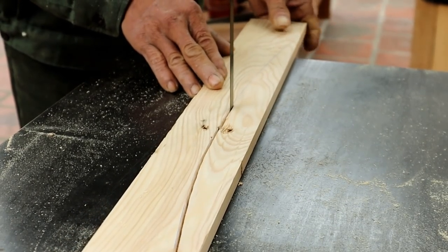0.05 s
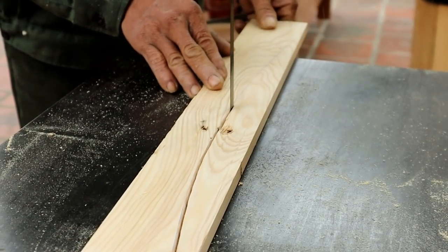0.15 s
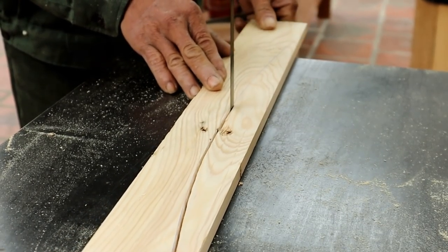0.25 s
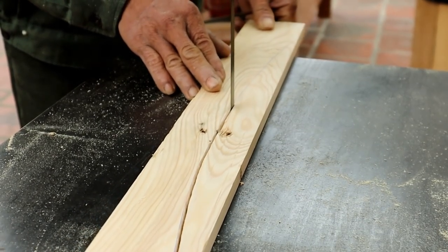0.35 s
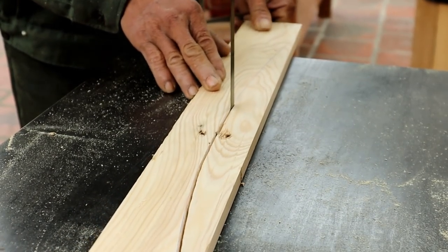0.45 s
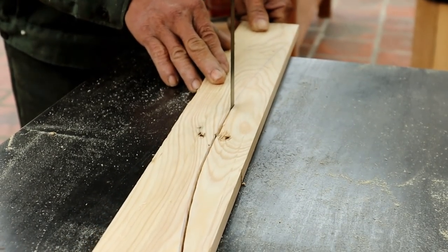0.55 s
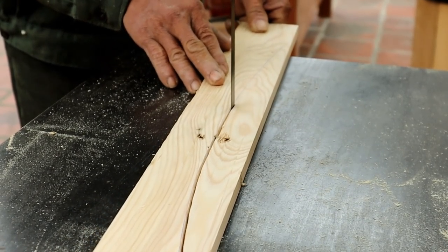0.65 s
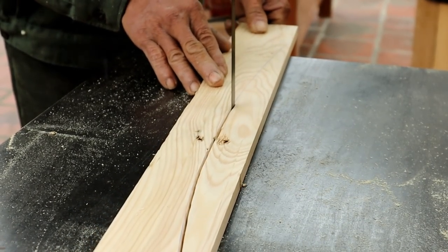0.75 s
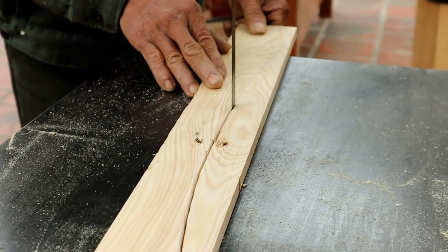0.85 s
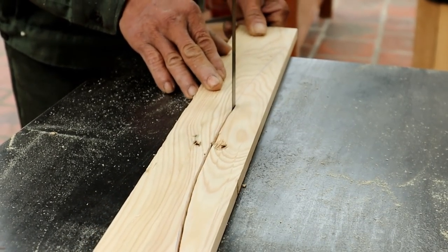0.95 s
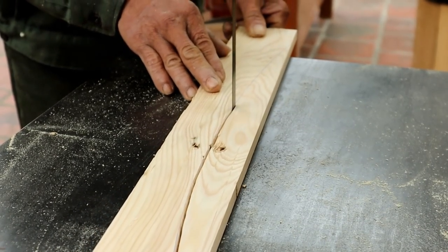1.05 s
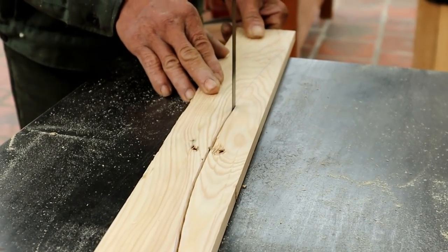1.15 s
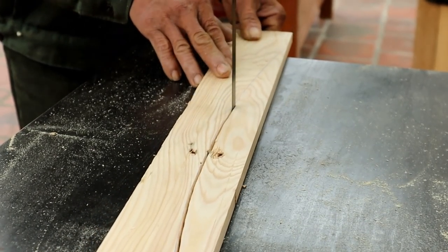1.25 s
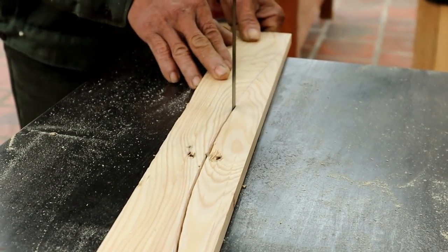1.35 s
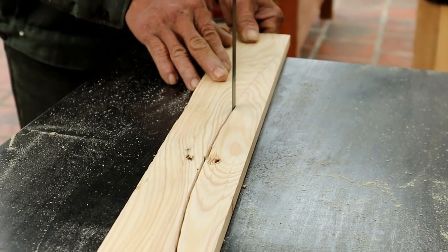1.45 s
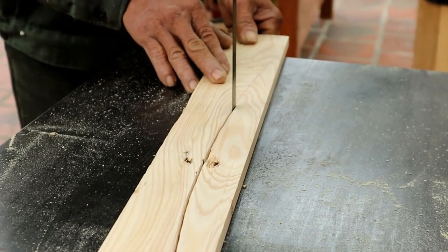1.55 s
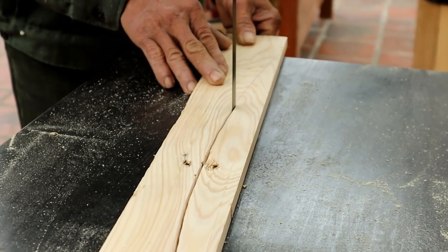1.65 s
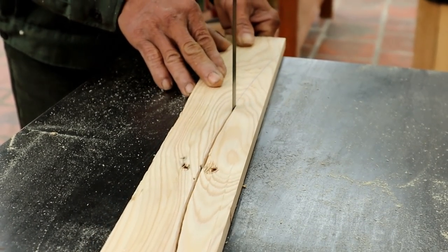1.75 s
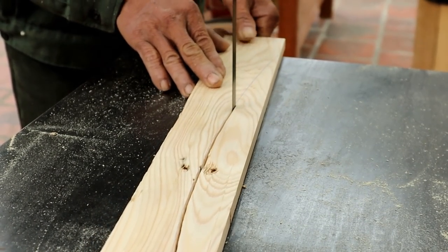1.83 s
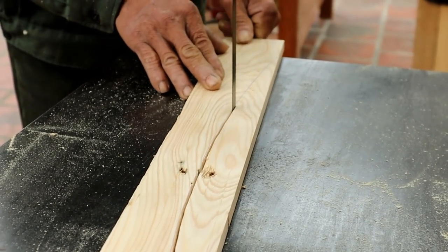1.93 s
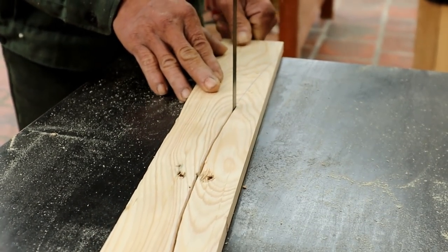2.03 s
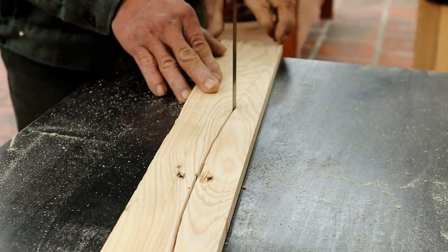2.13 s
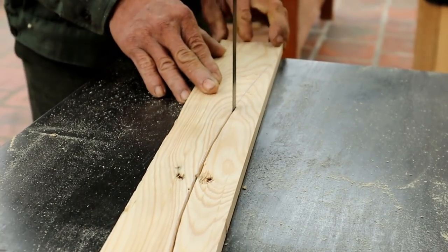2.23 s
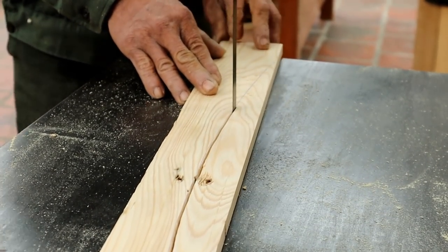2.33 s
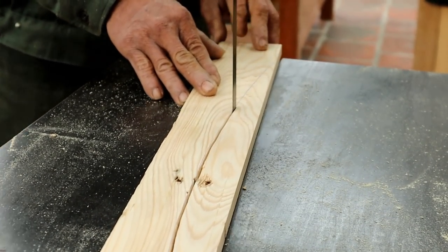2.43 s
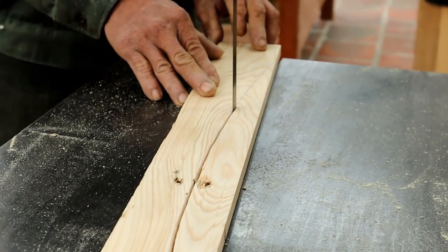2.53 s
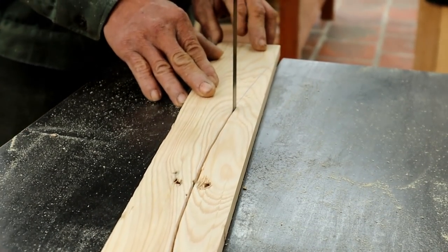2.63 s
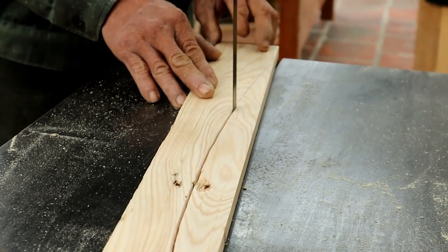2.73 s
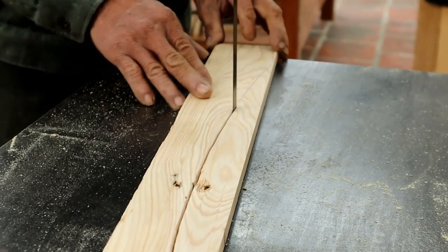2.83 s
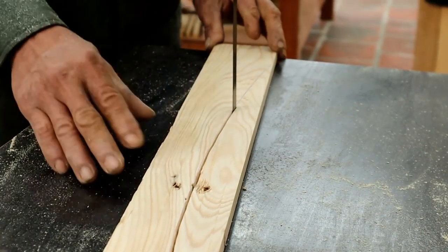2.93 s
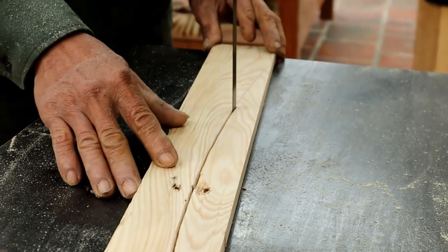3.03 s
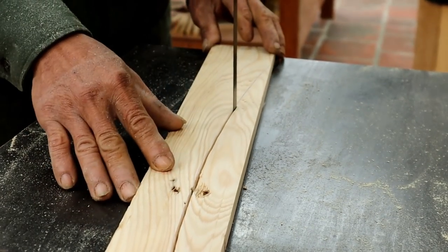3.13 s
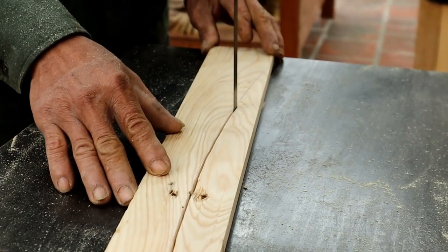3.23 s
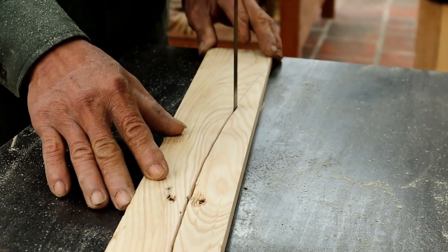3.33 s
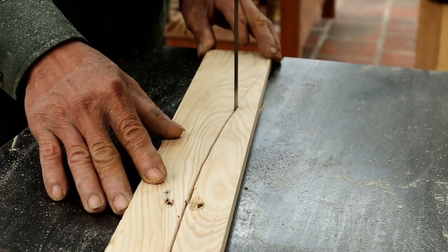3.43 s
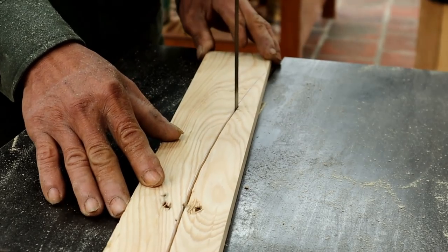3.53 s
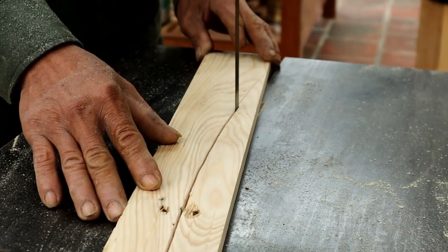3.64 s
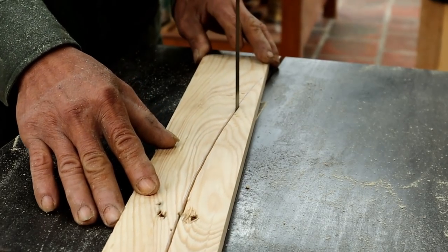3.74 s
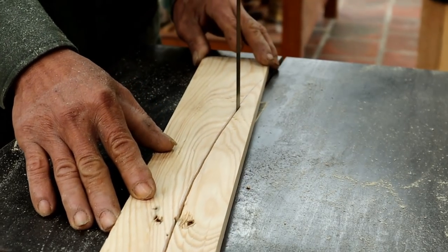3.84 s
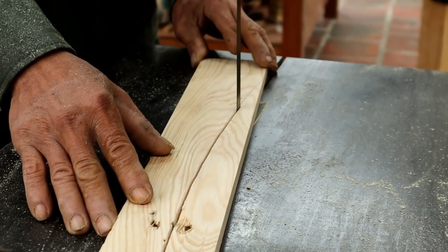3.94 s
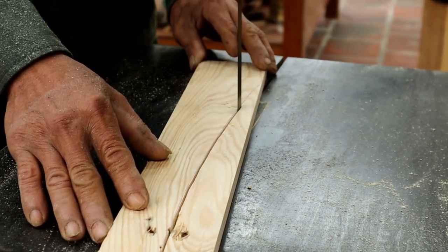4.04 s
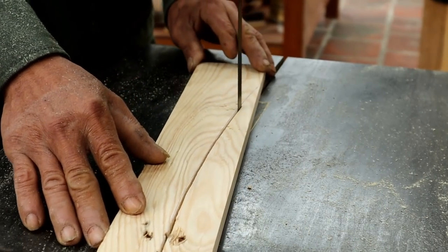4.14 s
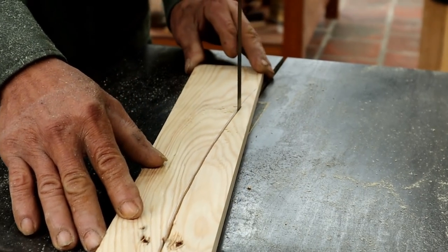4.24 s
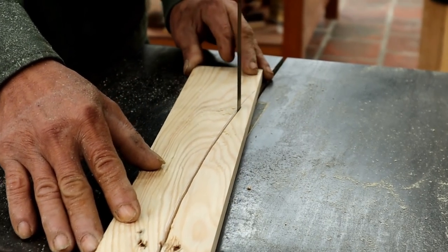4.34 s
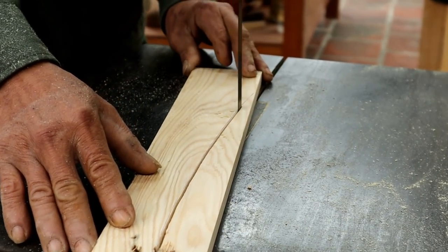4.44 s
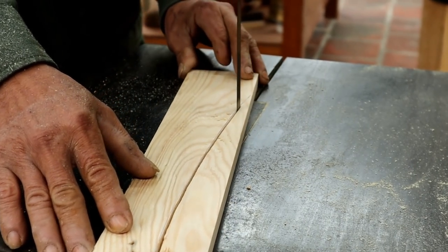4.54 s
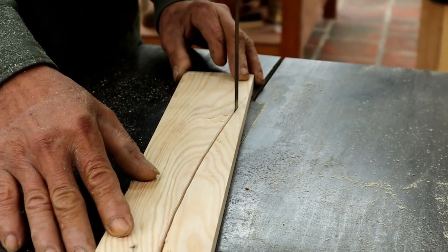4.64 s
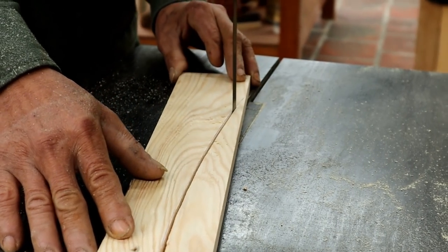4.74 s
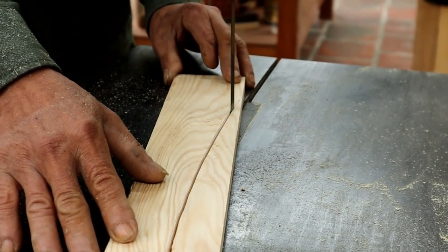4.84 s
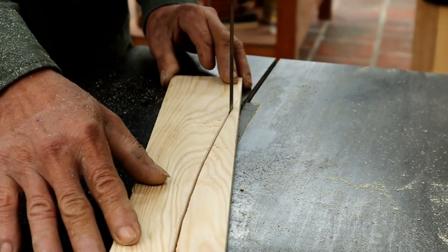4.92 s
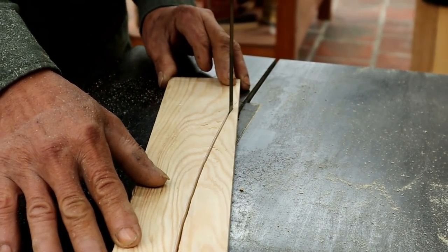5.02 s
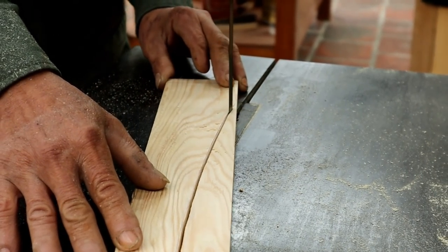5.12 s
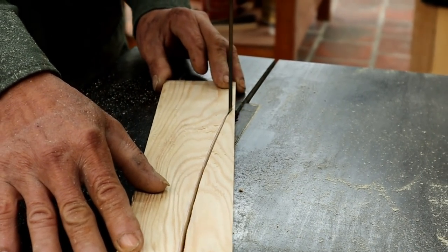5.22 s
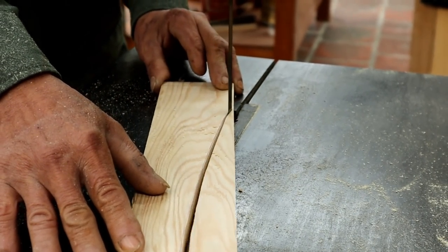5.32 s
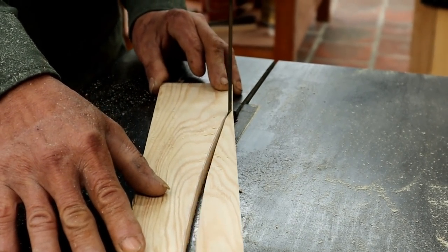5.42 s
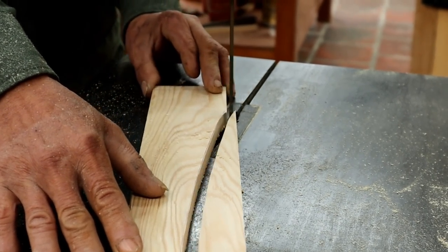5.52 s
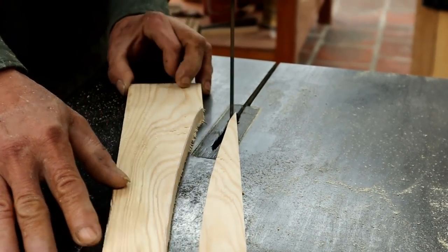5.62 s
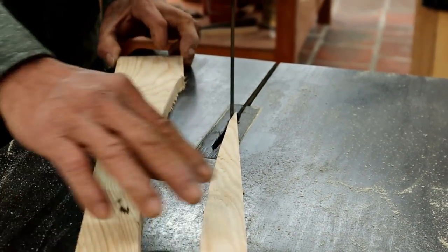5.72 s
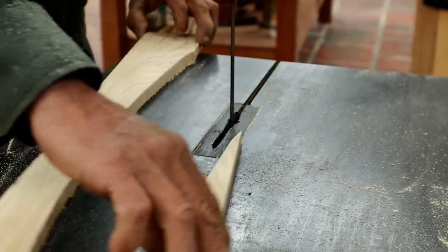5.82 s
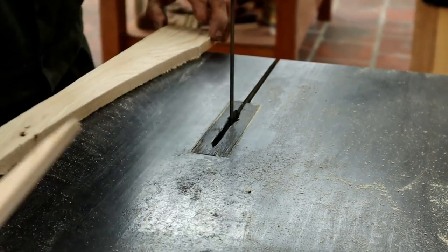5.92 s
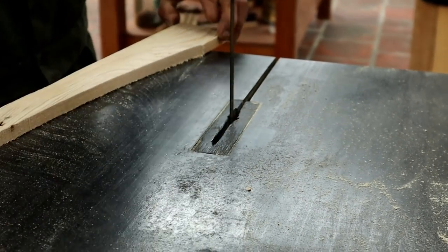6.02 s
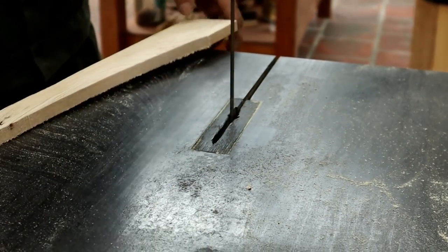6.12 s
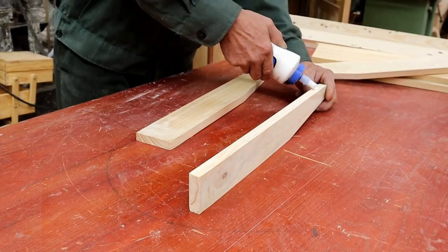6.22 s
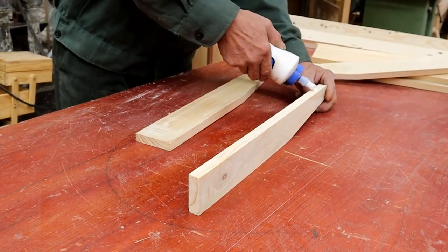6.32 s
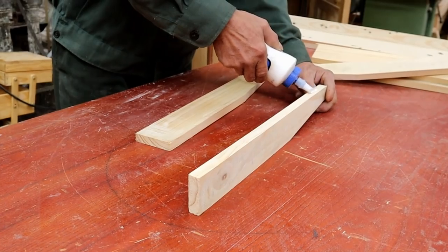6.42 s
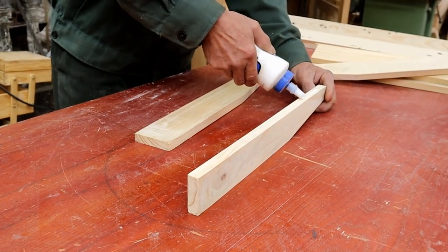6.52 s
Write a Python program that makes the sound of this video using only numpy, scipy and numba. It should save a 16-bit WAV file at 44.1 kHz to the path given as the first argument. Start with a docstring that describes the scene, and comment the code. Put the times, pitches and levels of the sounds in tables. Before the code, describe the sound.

A bandsaw cuts along a pine board, heard close in a workshop. Dense, gritty rasp and bright chip hiss waver with the feed, the board ringing in sliding tones and the blade squealing thinly. At about 5.5 seconds the blade leaves the wood and only steady hiss and faint motor hum remain. A sharp little tick follows, then everything stops dead, leaving very quiet room tone.

```python
"""A bandsaw rips a curve along a pine board: teeth rasp and throw hissing chips as the hands push and ease off.
The cut rings the band and the board, whose resonances slide as the kerf grows; the band squeals thinly.
Beneath, filtered noise makes the running band hiss in its guides; sines make the motor hum and whine.
The band breaks out near 5.5 s and ticks against the loose piece.
At last the sound of the saw stops dead and quiet room tone follows."""
import sys
import numpy as np
from scipy import signal
from scipy.fft import rfft, irfft, next_fast_len
from scipy.io import wavfile
from scipy.ndimage import uniform_filter1d
from numba import njit

SR = 44100
rng = np.random.default_rng(int(sys.argv[2]) if len(sys.argv) > 2 else 0)


def unload_wav(signal):
    """Save mono or channel-first audio to the path in sys.argv[1] as 16-bit WAV at rate SR, clipped to [-1, 1]."""
    wavfile.write(
        sys.argv[1],
        SR,
        np.round(np.clip(np.atleast_2d(signal).T, -1, 1) * 32767).astype(np.int16),
    )


N = 289737
TIME_S = np.arange(N) / SR

TOOTH_HZ, LAP_HZ, SQUEAL_HZ = 127.2, 9.7, 11129
BREAKOUT_S, BREAKOUT_FADE_S = 5.48, 0.038  # the band leaves the wood
STOP_S, CUTOFF_HZ = 6.262, 15750
# dB per dB of feed pressure
RASP_FOLLOWS, CHIPS_FOLLOW, SQUEAL_FOLLOWS = 0.66, 0.19, 1.1

# course of the cut at even feed, before trims: (time [s], low rasp level [dB], chip hiss level [dB])
CUT_COURSE = [(0, -56, -45), (1.4, -52.5, -43), (2.3, -56.5, -45.5), (2.95, -60.5, -45.5),
              (3.2, -57, -41.5), (4.3, -54.5, -40), (5.1, -55, -39), (5.35, -54, -38)]
# hands push harder (+) or ease off (-): (middle [s], length [s], feed pressure change [dB])
FEED_PUSHES = [(0.108, 0.1, -9), (0.35, 0.12, 1), (0.53, 0.26, -2), (1.084, 0.082, 0), (1.406, 0.07, 1),
               (1.865, 0.096, -6.5), (2.051, 0.09, 4.5), (2.153, 0.1, -9), (2.37, 0.11, 0.5),
               (2.622, 0.07, -3.5), (2.81, 0.14, -4), (4.296, 0.14, -5), (4.49, 0.18, 2), (4.73, 0.13, -5),
               (4.94, 0.081, -2)]
# rasp spectrum shape: (frequency [Hz], density [dB per Hz])
RASP_SPECTRUM = [(400, -30.5), (750, -10.5), (1200, -3.5), (1600, -1.5), (2100, 1), (2420, -6),
                 (2900, -0.5), (4000, 1.5), (5200, -1.5), (6500, -17.5), (9000, -21)]
# chip hiss spectrum shape: (frequency [Hz], density [dB per Hz])
CHIP_SPECTRUM = [(3000, -21.5), (5500, -4.5), (6400, 0.5), (7600, -2.5), (9200, 1.5), (11500, -1),
                 (14500, 2.5), (15700, -2.5)]
# frame and steel band resonances:
# (frequency [Hz], width [Hz], level running free [dB], level relative to rasp when cutting [dB])
SAW_RESONANCES = [(728.3, 21, -68.5, -30.5), (836.6, 12, -76.5, -17.5), (915, 22, -69, -26.5),
                  (1047.7, 15, -69, -24.5), (1228, 78, -69, -20.5), (2206, 26, -73, -21),
                  (3482, 47, -66, -16), (3583, 55, -56.5, -2.5), (3778, 10, -64.5, -17),
                  (4203, 97, -62.5, -20), (4580, 74, -68.5, -20.5), (5390, 180, -61, -10),
                  (6380, 75, -61, -10.5), (6720, 46, -59.5, -9.5), (6900, 44, -65.5, -9.5),
                  (7944, 78, -59, -15.5), (8430, 70, -59, -18), (8786, 120, -57, -12.5),
                  (9330, 30, -78.5, -22), (10170, 78, -61, -16.5)]
# board resonances, swelling and sliding as the kerf passes:
# (peak time [s], rise [s], fall [s], frequency at peak [Hz], slide [Hz/s], level [dB], lap throb [dB])
BOARD_RESONANCES = [(0.15, 0.4, 0.27, 2864, 1, -60.5, 2.5), (0.33, 0.8, 0.8, 3420, 91, -49, 2),
                    (0.45, 0.6, 0.53, 1250, -27.5, -61.5, 5.5), (0.75, 0.18, 0.28, 1730, 0, -60.5, 1.5),
                    (1.00, 0.26, 0.7, 4280, -250, -57.5, 1.5), (1.40, 1.3, 0.66, 5400, -450, -54.5, -1),
                    (1.55, 0.19, 0.4, 1866, -57.5, -54.5, 2), (1.70, 0.4, 0.17, 1358, -140, -59.5, 1.5),
                    (2.05, 0.1, 0.54, 1782, 75, -54, 0.5), (2.40, 0.61, 0.61, 1238, -110, -56, 2.5),
                    (3.25, 0.34, 0.49, 1766, 134, -52.5, 1.2), (3.30, 0.45, 0.74, 1116, -190, -59.5, 6.5),
                    (4.05, 0.63, 0.8, 1464, -105, -51.5, 1), (4.10, 0.73, 0.75, 10770, -720, -49.5, 0.5),
                    (4.46, 0.42, 0.2, 2863, -32, -54, 4.5), (4.60, 0.81, 0.8, 9300, -150, -54.5, 4),
                    (4.95, 0.35, 0.16, 10060, -700, -50, -3.5), (5.05, 0.19, 0.28, 2770, -120, -56.5, 3),
                    (5.08, 0.27, 0.27, 1395, -220, -57.5, -1), (5.36, 0.25, 0.36, 9110, -1700, -48, 3.5),
                    (5.45, 0.14, 0.3, 11700, -2000, -48.5, 1)]
# saw table modes, rung by the board lying on it: (frequency [Hz], width [Hz], coupling [dB])
TABLE_RESONANCES = [(1452, 9, -28), (1723, 30, -32), (2896, 24, -28)]
# band binding in the curve: (peak time [s], rise [s], fall [s], level before trims [dB])
BINDINGS = [(1.55, 0.4, 0.35, -55.5), (2.0, 0.17, 1, -50.5), (3.19, 0.2, 0.1, -46), (3.9, 0.4, 0.8, -60),
            (5.33, 0.24, 0.2, -46.5)]
# blows of the freed wood on the band: (time [s], level [dB])
TICK_BLOWS = [(6.1187, -31.5), (6.1245, -42)]
# resonances rung by a tick, before trim: (frequency [Hz], width [Hz], level [dB])
TICK_RESONANCES = [(2150, 90, -13.5), (5900, 400, -23), (6330, 250, -8), (7750, 300, -3.5),
                   (11600, 400, -5.5)]
# running band hiss spectrum shape: (frequency [Hz], density [dB per Hz])
GUIDE_SPECTRUM = [(25, -17.5), (130, -14), (520, -15.5), (640, -6.5), (1000, -8), (1500, -9.5),
                  (2900, -13.5), (3500, -6), (5600, -4), (8500, -2), (11500, -0.5), (15700, 1)]
# motor hum: (frequency [Hz], mean level in mid [dB])
HUM_TONES = [(301.4, -66.8), (602.8, -70.3)]
# wheel and guide roller whines, before trim: (frequency [Hz], level free [dB], level under load [dB])
WHINE_TONES = [(1551, -75, -64), (2495, -74, -78), (3709, -75, -62.5), (4883, -69, -68.5), (5559, -74, -67),
               (5987, -67.5, -67.5)]
# quiet room tone, moved by faint handling: (time [s], level [dB])
ROOM_LEVEL = [(6.3, -88.5), (6.37, -84), (6.41, -87), (6.47, -83), (6.54, -83.5)]
# room tone spectrum shape: (frequency [Hz], density [dB per Hz])
ROOM_SPECTRUM = [(18, -56), (30, -24), (185, 0), (355, -5.5), (905, -11.5), (1090, -9), (1830, -15),
                 (15000, -34)]
# stereo width: (frequency [Hz], side minus mid [dB])
STEREO_WIDTH = [(60, 2), (150, 0), (400, -0.5), (700, -11), (1500, -10), (3000, -9.5), (5000, -1.5),
                (9000, -0.5), (14000, 1)]
# stereo balance: (frequency [Hz], left minus right [dB])
STEREO_LEAN = [(100, -2), (500, -1), (1500, -0.5), (3200, -1.5), (6000, -2.5), (9500, -3.5), (14000, -2.5)]


def from_db(db):
    """Amplitude from dB."""
    return 10 ** (np.asarray(db) / 20)


def rms_one(x):
    """Scale to RMS 1."""
    return x / np.sqrt(np.mean(x ** 2) + 1e-20)


def in_time(rows):
    """Table columns interpolated at every sample."""
    time_s, *columns = np.transpose(rows)
    return [np.interp(TIME_S, time_s, column) for column in columns]


def swell(peak_s, rise_s, fall_s):
    """Bell of height 1, about 9 dB down one rise before and one fall after its top."""
    spread_s = np.where(TIME_S < peak_s, rise_s, fall_s)
    return np.exp(-((TIME_S - peak_s) / spread_s) ** 2)


def noise():
    """Unrelated white noise for mid and side."""
    return rng.standard_normal((2, N))


def drift(rate_hz):
    """Smooth random wander of RMS 1: two-pole filtered noise, interpolated from every 40th sample."""
    step = 40
    r = np.exp(-2 * np.pi * rate_hz * step / SR)
    settle = 2000  # dropped start of the filter
    white = rng.standard_normal(N // step + settle + 2)
    slow = signal.lfilter([1], [1, -2 * r, r * r], white)[settle:]
    return np.interp(np.arange(N) / step, np.arange(len(slow)), rms_one(slow))


def colour(x, spectrum, power=1):
    """Filter by a (frequency [Hz], gain [dB]) table; power scales the dB."""
    size = next_fast_len(N + 4096)
    hz, db = np.transpose(spectrum)
    bins_hz = np.maximum(np.arange(size // 2 + 1) * SR / size, 1)
    gain_db = power * np.interp(np.log(bins_hz), np.log(hz), db)
    return irfft(rfft(x, size) * from_db(gain_db), size)[..., :N]


def resonate(x, hz, width_hz):
    """Two-pole resonance that keeps the power of white noise."""
    r = np.exp(-np.pi * width_hz / SR)
    zeros = np.sqrt((1 - r * r) / 2) * np.array([1, 0, -1])
    poles = [1, -2 * r * np.cos(2 * np.pi * hz / SR), r * r]
    return signal.lfilter(zeros, poles, x + 1e-18)


@njit
def slide(x, angle, r):
    """Two-pole resonance whose centre moves."""
    y = np.zeros_like(x)
    for c in range(2):
        for i in range(2, x.shape[1]):
            drive = x[c, i] - x[c, i - 2]
            y[c, i] = drive + 2 * r * np.cos(angle[i]) * y[c, i - 1] - r * r * y[c, i - 2]
    return y


def tooth_bites(depth, snaps, flutter_db, uneven_db=4, snap_db=4, snaps_per_s=500, snap_s=0.0016, bite_share=0.52):
    """Teeth strike in turn, each with its own force; fibres snap at random and the band flutters."""
    turns = np.cumsum(TOOTH_HZ * (1 + .004 * drift(3.4))) / SR  # teeth passed
    force = from_db(uneven_db * rng.standard_normal(2000))[turns.astype(int)]
    bites = rms_one(force * np.exp(-(turns % 1) / bite_share))
    starts = rng.random(N) < snaps_per_s / SR
    strength = from_db(snap_db * np.minimum(rng.exponential(1, N), 4))
    breaks = signal.lfilter([1], [1, -np.exp(-1 / (snap_s * SR))], starts * strength)
    flutter = from_db(flutter_db * drift(25))
    return rms_one((1 + depth * bites + snaps * rms_one(breaks)) * flutter)


def feed_pressure(steepness=7):
    """Feed pressure in dB about an even feed: each push or easing sets in, holds and lets go."""
    return sum(db * np.exp(-np.abs(2 * (TIME_S - middle_s) / length_s) ** steepness)
               for middle_s, length_s, db in FEED_PUSHES)


def cutting(bites, feed_db, chatter_db=2.5, grain_db=1.0):
    """Teeth tear fibres (rasp), throw chips (hiss) and drive the saw's resonances in uneven bursts."""
    rasp_db, chips_db = in_time(CUT_COURSE)
    grain = grain_db * drift(7)
    rasp_db = rasp_db + RASP_FOLLOWS * feed_db + grain
    chips_db = chips_db + CHIPS_FOLLOW * feed_db + grain
    rasp = from_db(rasp_db + 1.5) * rms_one(colour(noise() * bites, RASP_SPECTRUM))
    chips = from_db(chips_db - 1.63) * rms_one(colour(noise() * bites, CHIP_SPECTRUM))
    chatter = rms_one(from_db(chatter_db * drift(21)))
    drive = noise() * bites * from_db(rasp_db) * chatter
    rings = sum(from_db(db) * resonate(drive, hz, width_hz) for hz, width_hz, _, db in SAW_RESONANCES)
    return rasp + chips + rings


def board(bites, feed_db, damping=0.037, skirt=4, grip=0.19):
    """Teeth ring the board in step with the feed; resonances come and go as the cut passes, ringing the table."""
    # the cut throbs about ten times a second, once per lap of the band
    lap = np.sin(2 * np.pi * np.cumsum(LAP_HZ * (1 + 0.071 * drift(2.4))) / SR)
    wood = 0
    for peak_s, rise_s, fall_s, hz, hz_per_s, db, throb_db in BOARD_RESONANCES:
        centre_hz = hz + hz_per_s * np.clip(TIME_S - peak_s, -2 * rise_s, 2 * fall_s)
        angle = 2 * np.pi * centre_hz / SR
        r = np.exp(-np.pi * damping * hz / SR)
        ring = slide(slide(noise() * bites, angle, r), angle, r ** skirt)
        # kerf friction holds large swings back
        ring = ring / (uniform_filter1d(ring ** 2, size=1500) + 1e-9) ** grip
        level = from_db(db + feed_db + throb_db * lap)
        wood = wood + rms_one(ring) * level * swell(peak_s, rise_s, fall_s)
    table = sum(from_db(db) * resonate(wood, hz, width_hz) for hz, width_hz, db in TABLE_RESONANCES)
    return wood + table


def squeal(feed_db, width_hz=30, rough=0.47, waver_hz=12):
    """The band's flank sticks and slips in the curved kerf: one thin, unsteady tone."""
    binding = sum(from_db(db) * swell(peak_s, rise_s, fall_s) for peak_s, rise_s, fall_s, db in BINDINGS)
    phase = 2 * np.pi * np.cumsum(SQUEAL_HZ + waver_hz * drift(10)) / SR
    pure = np.array([np.sin(phase), np.cos(phase)])
    tone = rms_one(pure + rough * resonate(noise(), SQUEAL_HZ, width_hz))
    mid_side_gain = from_db([[-.7], [3]])
    return tone * binding * from_db(SQUEAL_FOLLOWS * feed_db) * mid_side_gain


def ticks(tail_s=0.02, tail_db=-8, thin_hz=2500):
    """A tooth catches the loose wood: a short bright crack with a ringing tail."""
    blow = np.zeros(N)
    for start_s, db in TICK_BLOWS:
        age_s = np.maximum(TIME_S - start_s, 0)
        decay = np.exp(-age_s / .002) + from_db(tail_db) * np.exp(-age_s / tail_s)
        blow += from_db(db) * (TIME_S >= start_s) * decay
    crack = noise() * blow
    high_pass = signal.butter(2, thin_hz, "high", fs=SR, output="sos")
    bright = signal.sosfilt(high_pass, crack)
    rings = sum(from_db(db - 4) * resonate(crack, hz, width_hz) for hz, width_hz, db in TICK_RESONANCES)
    return .5 * bright + rings


def free_band():
    """The moving band scrapes its guides, ringing itself and the frame."""
    scrape = tooth_bites(depth=0.14, snaps=0.19, flutter_db=0.7)
    rub = noise() * scrape
    rings = sum(from_db(db) * resonate(rub, hz, width_hz) for hz, width_hz, db, _ in SAW_RESONANCES)
    hiss = rms_one(colour(noise() * scrape, GUIDE_SPECTRUM))
    return rings + from_db(-44.0) * hiss


def motor(swell_db=3.5):
    """Nearly steady hum, and unsteady whines that change when the wood stops loading the band."""
    seconds = TIME_S + np.cumsum(.0005 * drift(6)) / SR  # speed wanders slightly
    hum = sum(from_db(db + 0.53 * drift(7.1)) * np.sin(2 * np.pi * hz * seconds) for hz, db in HUM_TONES)
    load = np.interp(TIME_S, [5.3, 5.5], [1, 0])
    whine = 0
    for hz, free_db, loaded_db in WHINE_TONES:
        level_db = free_db + load * (loaded_db - free_db) + swell_db * drift(7.4)
        whine = whine + from_db(level_db) * np.sin(2 * np.pi * hz * seconds)
    mid_side_gain = np.array([[1], [.1]])
    return (hum + from_db(1.5) * whine) * mid_side_gain


def room_tone():
    """Low coloured noise, its level moved by faint handling."""
    level_db, = in_time(ROOM_LEVEL)
    return from_db(level_db) * rms_one(colour(noise(), ROOM_SPECTRUM))


def microphones(mid, side, glance=1.0, glance_s=0.0013, glance_hz=3500):
    """Treble glancing off table and frame reaches each side differently; the middle range arrives straight on."""
    age_s = TIME_S[:SR // 100]
    envelope = (1 - np.exp(-age_s / glance_s)) * np.exp(-age_s / glance_s)
    paths = rng.standard_normal(len(age_s)) * envelope
    high_pass = signal.butter(2, glance_hz, "high", fs=SR, output="sos")
    treble = signal.sosfilt(high_pass, mid)
    glanced = signal.fftconvolve(treble, paths / np.linalg.norm(paths))[:N]
    side = colour((side + glance * glanced) / np.hypot(1, glance), STEREO_WIDTH)
    left = colour(mid + side, STEREO_LEAN, .5)
    right = colour(mid - side, STEREO_LEAN, -.5)
    return np.array([left, right])


def scene():
    """The cut until breakout, the running saw until its sound stops dead, and the quiet room tone."""
    bites = tooth_bites(depth=0.12, snaps=.3, flutter_db=0.28)
    feed_db = feed_pressure()
    in_wood = np.exp(-np.maximum(TIME_S - BREAKOUT_S, 0) / BREAKOUT_FADE_S)
    cut = (cutting(bites, feed_db) + board(bites, feed_db) + squeal(feed_db)) * in_wood
    # the sound stops dead, with the briefest of tails
    after_s = np.maximum(TIME_S - STOP_S, 0)
    audible = np.maximum(np.exp(-after_s / 0.00039), from_db(-31) * np.exp(-after_s / 0.0083))
    saw = (cut + ticks() + free_band() + motor()) * audible
    mid, side = saw + room_tone()
    return microphones(mid, side)


def record(dry):
    """Steep low-pass at CUTOFF_HZ."""
    low_pass = signal.firwin(601, CUTOFF_HZ, window="blackman", fs=SR)
    return signal.fftconvolve(dry, [low_pass], "same")


dry = scene()
out = record(dry)
unload_wav(out)
```